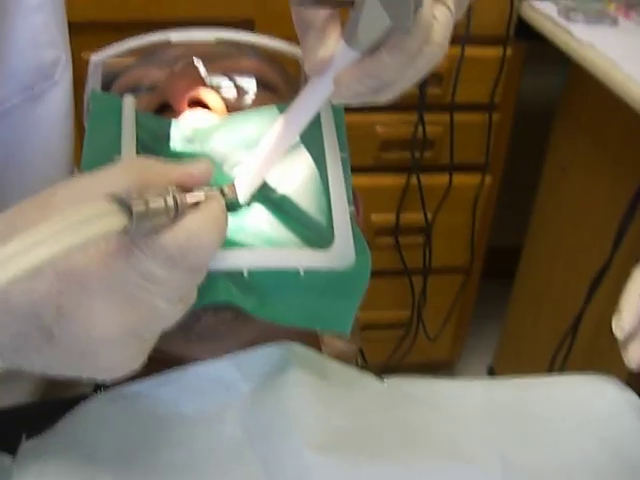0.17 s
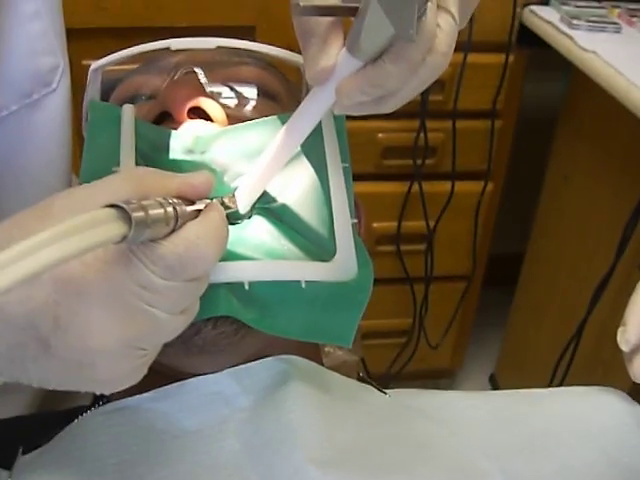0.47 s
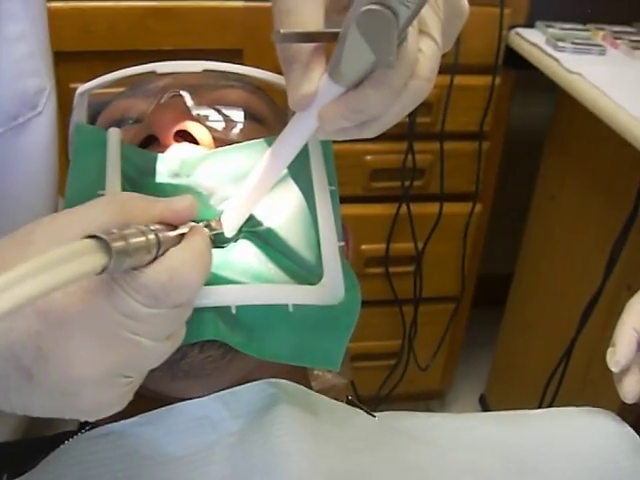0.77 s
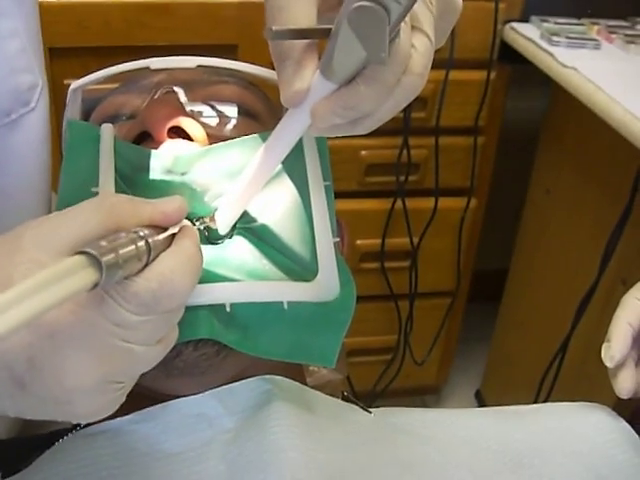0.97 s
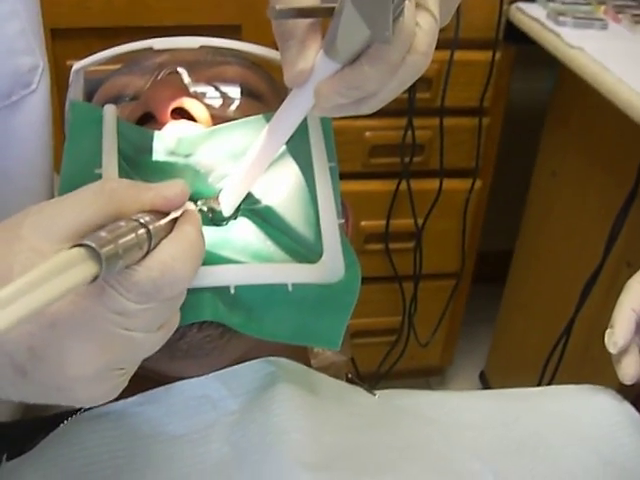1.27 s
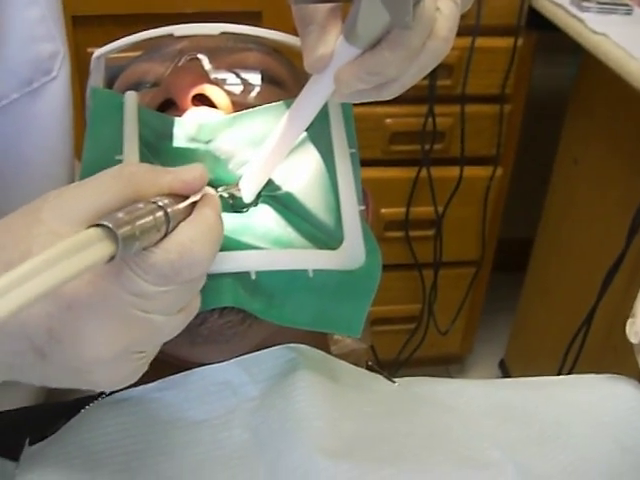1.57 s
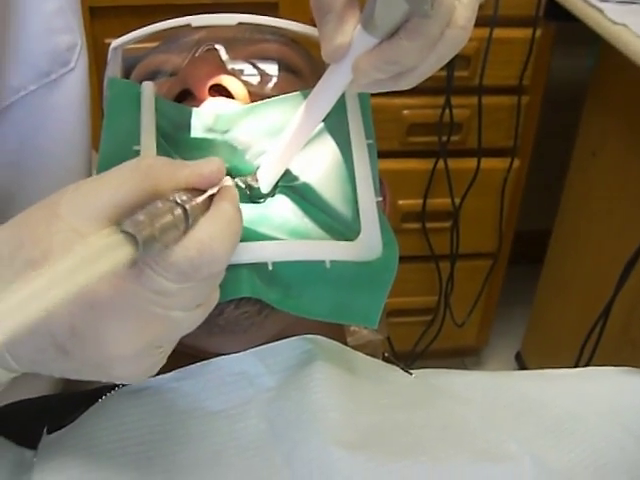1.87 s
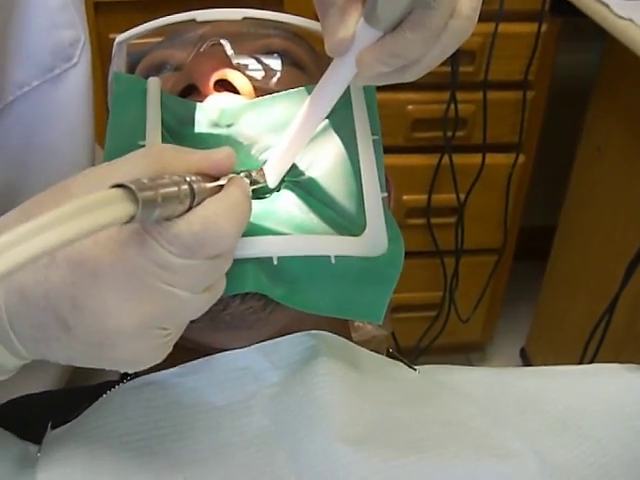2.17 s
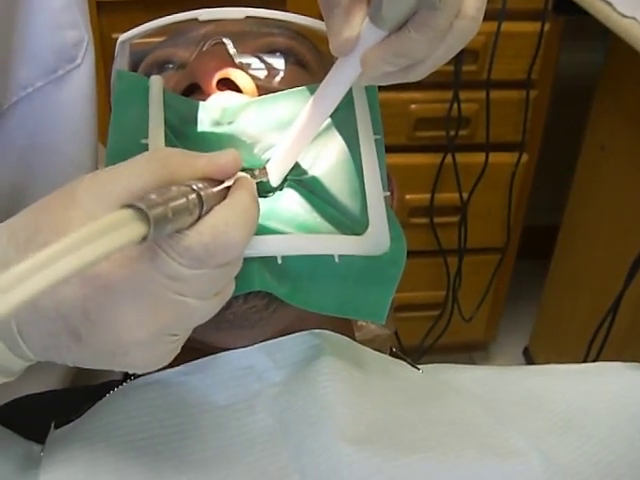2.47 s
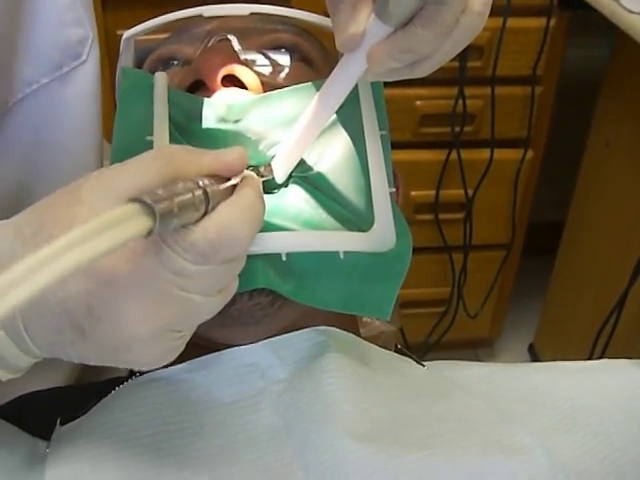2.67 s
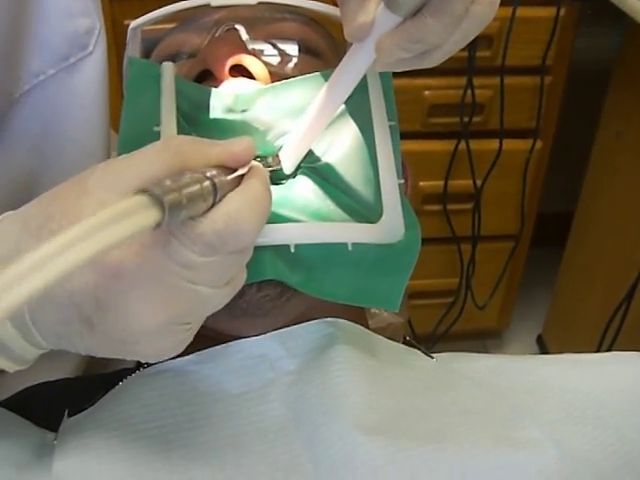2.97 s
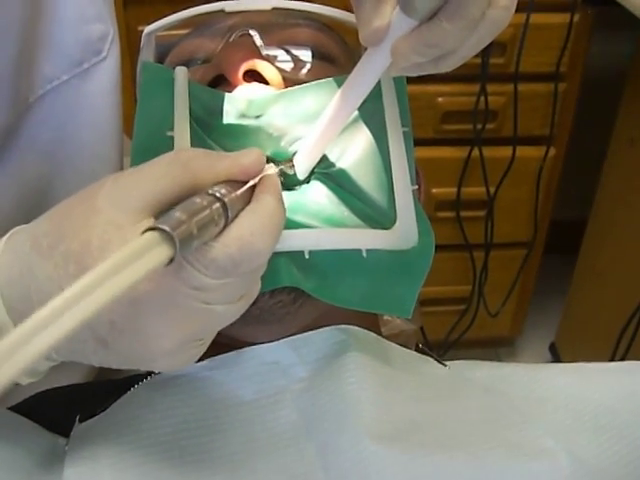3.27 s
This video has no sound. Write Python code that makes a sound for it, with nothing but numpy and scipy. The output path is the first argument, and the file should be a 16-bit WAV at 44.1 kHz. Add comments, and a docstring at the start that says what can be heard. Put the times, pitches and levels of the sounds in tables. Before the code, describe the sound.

High dental handpiece whine wavers and dips under load amid constant airy suction hiss.

```python
"""A dental air turbine whines close to the microphone, a swept sine with its octave; it slows and chatters in
spells as the bur bites into the tooth, and once the suction slurps with a rough band gliding upward. Shaped
noise gives the suction hiss, the spray and grinding fizz above it and the low clinic rumble. Narrow modulated
noise gives the whistles of the suction tube; a decaying noise tail gives the room. The microphone wakes with a
thump and its gain rises; soft bumps, a small click and brief blips follow."""
import sys
import numpy as np
from scipy import signal
from scipy.fft import rfft, irfft, next_fast_len
from scipy.io import wavfile
from scipy.ndimage import uniform_filter1d, map_coordinates

SR = 44100
rng = np.random.default_rng(int(sys.argv[2]) if len(sys.argv) > 2 else 0)


def store_pcm(level_fs):
    """Save levels as 16-bit WAV."""
    pcm = np.round(np.clip(level_fs, -1, 1) * 32767).astype(np.int16)
    wavfile.write(sys.argv[1], SR, np.atleast_2d(pcm).T)


def attenuation_scalar(level_db):
    """Turn a level in dB into a linear amplitude multiplier (20 dB per decade)."""
    decades = np.asarray(level_db, float) / 20
    return 10 ** decades


N = 150381
T = np.arange(N) / SR  # time [s]


def unit(x):
    """Normalization: scale to rms 1."""
    return x / np.sqrt(np.mean(x ** 2) + 1e-20)


def curves(rows):
    """Linear interpolation: one value per sample for each column after the time."""
    times, *columns = np.transpose(rows)
    return [np.interp(T, times, column) for column in columns]


def wobble(rate):
    """Band-limited noise: a smooth random curve through rate knots a second."""
    knots = rng.standard_normal(int(N * 2500 / SR) + 8)
    return map_coordinates(knots, [np.arange(N) * np.clip(rate, 0, 2500) / SR])


def phase(hz):
    """Phase [rad] is the running integral of frequency."""
    return 2 * np.pi * np.cumsum(hz) / SR


def noise_band(rate, turn):
    """Quadrature modulation: two random envelopes spread a carrier of phase turn into a band."""
    return wobble(rate) * np.sin(turn) + wobble(rate) * np.cos(turn)


def filtered(x, response):
    """Linear filtering: multiply the spectrum by a response of frequency."""
    size = next_fast_len(N + 8192)
    return irfft(rfft(x, size) * response(np.fft.rfftfreq(size, 1 / SR)), size)[..., :N]


def rush(spectrum, patchy_db):
    """Turbulence noise: coloured noise of rms 1 whose gain varies in time-frequency patches."""
    f, db = np.transpose(spectrum)
    z = signal.stft(rng.standard_normal(N), nperseg=512)[2]
    field = uniform_filter1d(rng.standard_normal(z.shape), size=5, axis=0)
    field = uniform_filter1d(field, size=10, axis=1)
    x = signal.istft(z * attenuation_scalar(patchy_db * unit(field)), nperseg=512)[1][:N]
    return unit(filtered(x, lambda hz: attenuation_scalar(np.interp(np.log(hz + 1), np.log(f), db))))


# Turbine speed as the pitch of the whine: (time [s], frequency [Hz])
SPEED = [(0.055, 6440), (0.12, 6320), (0.19, 6340), (0.284, 6210), (0.384, 6590), (0.419, 6650),
         (0.499, 6610), (0.534, 6400), (0.599, 5770), (0.629, 5620), (0.654, 5700), (0.714, 6240),
         (0.748, 6320), (0.823, 6140), (0.928, 5580), (0.988, 5630), (1.073, 5560), (1.152, 5550),
         (1.207, 5730), (1.307, 5800), (1.357, 5640), (1.372, 5640), (1.412, 5980), (1.467, 6330),
         (1.502, 6480), (1.537, 6540), (1.611, 6440), (1.721, 6550), (1.816, 6540), (1.886, 6120),
         (1.906, 6100), (1.936, 5920), (2.005, 6290), (2.08, 6470), (2.2, 6520), (2.305, 6480),
         (2.365, 6420), (2.439, 6190), (2.514, 5820), (2.539, 5780), (2.564, 5850), (2.669, 6340),
         (2.744, 6440), (2.794, 6430), (2.844, 6340), (3.048, 6480), (3.083, 6380), (3.118, 6180),
         (3.188, 6290), (3.218, 6230), (3.268, 6040), (3.342, 6000), (3.412, 6290)]
JITTER_HZ = 3.7


def rotor_phase():
    """Rotational source: the whine's phase follows the rotor speed, with a small random jitter."""
    return phase(uniform_filter1d(curves(SPEED)[0], size=700) + JITTER_HZ * wobble(120))


# Fundamental of the whine: (time [s], rms level [dB])
WHINE = [(0.055, -28), (0.165, -23.5), (0.26, -33), (0.285, -36), (0.319, -23.5), (0.364, -19),
         (0.384, -30), (0.399, -19.5), (0.424, -30), (0.439, -21), (0.479, -35), (0.504, -28), (0.539, -29),
         (0.65, -40), (0.662, -34), (0.7, -24), (0.725, -23), (0.745, -31), (0.795, -22), (0.815, -31),
         (0.868, -34), (0.888, -36), (0.938, -47), (0.955, -27), (0.985, -27), (1.013, -35), (1.048, -29),
         (1.083, -31), (1.102, -43), (1.142, -29), (1.152, -38), (1.192, -25), (1.23, -31), (1.27, -29.5),
         (1.372, -27), (1.402, -19.5), (1.517, -20.5), (1.546, -25), (1.686, -19.5), (1.756, -30.5),
         (1.821, -22), (1.846, -32), (1.896, -17.5), (1.926, -26.5), (1.976, -19.5), (2.16, -23),
         (2.29, -18.5), (2.35, -28.5), (2.469, -29), (2.519, -37), (2.555, -31), (2.579, -34),
         (2.619, -19.5), (2.664, -17.5), (2.789, -21.5), (2.824, -31), (2.868, -19.5), (2.908, -28),
         (2.928, -19), (2.998, -24), (3.033, -16), (3.088, -34), (3.124, -46), (3.131, -24), (3.178, -20.5),
         (3.213, -23), (3.263, -21), (3.312, -26), (3.332, -17), (3.367, -28), (3.392, -15), (3.412, -18)]
# Octave of the whine: (time [s], rms level [dB])
OCTAVE = [(.1, -50), (.4, -47), (.57, -36), (.7, -38), (.9, -45), (1.25, -46), (1.45, -41), (1.64, -39),
          (1.75, -44), (1.85, -39), (2.26, -42), (2.55, -37), (2.65, -42), (2.83, -38), (2.97, -39),
          (3.1, -36), (3.17, -44), (3.3, -37)]
FLUTTER_DB, OCTAVE_FLUTTER_DB = 1.5, 3.5


def whine(turn):
    """Harmonic radiation: a sine at the whine's pitch and its octave, each with fluttering level."""
    (level_db,), (octave_db,) = curves(WHINE), curves(OCTAVE)
    fundamental = attenuation_scalar(level_db + FLUTTER_DB * wobble(60)) * np.sin(turn)
    octave = attenuation_scalar(octave_db + OCTAVE_FLUTTER_DB * wobble(30.3)) * np.sin(2 * turn)
    return np.sqrt(2) * (fundamental + octave)  # sine peak from rms


# Cutting load as a rough smear around the whine: (time [s], level [dB])
LOAD = [(.1, -46), (.48, -48), (.58, -33), (.66, -48), (.86, -37), (1.35, -32), (1.45, -44), (2.4, -43),
        (2.51, -29), (2.6, -51), (3.07, -52), (3.095, -36), (3.13, -42), (3.3, -23.5), (3.41, -46)]
SMEAR_HZ, OCTAVE_SMEAR_DB = 710, -3  # width around the fundamental, relative level around the octave


def cutting_smear(turn):
    """Random modulation: cutting broadens the whine and its octave into bands of noise."""
    smear = noise_band(SMEAR_HZ, turn)
    octave_smear = noise_band(2 * SMEAR_HZ, 2 * turn)
    return attenuation_scalar(curves(LOAD)[0]) * (smear + attenuation_scalar(OCTAVE_SMEAR_DB) * octave_smear)


# Chatter of the bur: (time [s], length [s], offset from the whine [Hz], rms level at mid-length [dB])
CHATTER = [(.52, .13, 235, -32), (.82, .07, 235, -30), (1.29, .09, 270, -34), (3.27, .08, -270, -37)]
CHATTER_WANDER_HZ = 16.7


def chatter(turn):
    """Sideband principle: chatter puts a second, wandering line beside the whine."""
    wander = phase(CHATTER_WANDER_HZ * wobble(60))
    x = np.zeros(N)
    for s, length, offset_hz, db in CHATTER:
        swell = np.sin(np.pi * np.clip((T - s) / length, 0, 1)) ** .5
        line = np.sin(turn + wander + 2 * np.pi * offset_hz * T)
        x += attenuation_scalar(db + 2.1 * wobble(54.8)) * swell * line
    return np.sqrt(2) * x


def turbine():
    """Superposition: whine, smear and chatter share one rotor phase."""
    turn = rotor_phase()
    return whine(turn) + cutting_smear(turn) + chatter(turn)


# Suction hiss through its resonances: (frequency [Hz], relative density [dB per Hz])
SUCTION = [(700, -18.5), (900, -16.5), (1020, -8), (1200, -17.5), (1600, -10.5), (2050, -13), (2350, -2.5),
           (2500, -0.5), (2850, 0.5), (3150, -5), (3400, -1), (3750, 1), (4000, -3), (4500, -3.5),
           (4930, 0.5), (5200, -1.5), (6300, 0), (8000, -4), (10000, -13), (16000, -42)]


def suction(level_db):
    """Turbulent flow noise coloured by the resonances of the suction."""
    return attenuation_scalar(level_db + 0.68 * wobble(70)) * rush(SUCTION, patchy_db=0.89)


# Cooling spray and grinding fizz: (frequency [Hz], relative density [dB per Hz])
SPRAY = [(4000, -23), (6500, -20), (8800, 1.5), (9400, -0.5), (10800, 1), (12000, -4.5), (13400, -6.5),
         (14800, -14), (16000, -9)]


def spray(level_db, tilt_db):
    """Broadband jet and abrasion noise, with the part above about 11.8 kHz raised or lowered by the tilt."""
    fizz = rush(SPRAY, patchy_db=1.0)
    top = filtered(fizz, lambda hz: 1 / (1 + (11800 / (hz + 1)) ** 16))
    return attenuation_scalar(level_db + 0.62 * wobble(150)) * (fizz - top + attenuation_scalar(tilt_db) * top)


# Moving air: (time [s], suction level before +3 [dB], spray level before +1 [dB], treble tilt [dB])
AIR = [(0.2, -20.5, -21.5, 3), (0.22, -25, -23, 2), (0.35, -25.5, -25.5, 4), (1.04, -26.5, -21.5, 0.5),
       (1.4, -26, -24, -1), (1.48, -27.5, -25.5, 1), (1.64, -26, -25.5, 0.5), (1.91, -27, -24, -1),
       (2.09, -26.5, -25.5, 0), (2.25, -27.5, -27, 1), (2.42, -24.5, -24.5, 2), (2.56, -25.5, -21.5, -1),
       (2.64, -27, -26, 0.5), (3.13, -26, -26, 0.5), (3.18, -23.5, -22.5, -2), (3.21, -28.5, -21.5, -5),
       (3.41, -27, -25.5, 1)]


def air():
    """Common modulation: suction and spray flutter partly together."""
    suction_db, spray_db, tilt_db = curves(AIR)
    shared_db = 0.68 * wobble(24.84)
    return suction(suction_db + 3.0 + shared_db) + spray(spray_db + 1.0 + shared_db, tilt_db)


# Whistling modes of the suction tube: (frequency [Hz], mean level [dB])
TUBE = [(3700, -42.5), (4900, -40)]
# half-width and drift as shares of the mode frequency
TUBE_WIDTH_SHARE, TUBE_DRIFT_SHARE, TUBE_SWING_DB = .03, .015, 4


def tube():
    """Pipe modes driven by wet airflow: narrow noise bands that drift in pitch, each swelling on its own."""
    x = np.zeros(N)
    for hz, db in TUBE:
        turn = phase(hz * (1 + TUBE_DRIFT_SHARE * wobble(6)))
        rough = noise_band(2 * TUBE_WIDTH_SHARE * hz, turn)
        x += attenuation_scalar(db + TUBE_SWING_DB * wobble(9.06)) * rough
    return x


# Rumble of machines and ventilation: (frequency [Hz], relative density [dB per Hz])
CLINIC = [(20, -9), (40, -13), (65, 1), (95, -12.5), (135, 2.5), (250, -5), (500, -6.5), (900, -5),
          (2000, -12), (5000, -30)]
CLINIC_DB = -45


def clinic():
    """Ambient noise: a low rumble of machines and ventilation, gently varying in level."""
    return attenuation_scalar(CLINIC_DB + 1.6 * wobble(5.26)) * rush(CLINIC, patchy_db=0.3)


ROOM_T60_S = 0.27


def room(x):
    """Diffuse reverberation: convolution with an exponentially decaying noise tail of unit energy."""
    t = np.arange(SR // 2) / SR
    tail = rng.standard_normal(len(t)) * attenuation_scalar(-60 * t / ROOM_T60_S) * (t > .004)
    return signal.fftconvolve(x, tail / np.linalg.norm(tail))[:N]


HISS_ROOM_DB = -6.5  # before the roll-offs at both ends


def hiss_in_room(hiss):
    """Interference: reflections stamp fine steady bands on the hiss, at equal mean power."""
    def share(hz):
        return attenuation_scalar(HISS_ROOM_DB) / np.sqrt((1 + (hz / 6000) ** 2) * (1 + (1200 / (hz + 1)) ** 2))

    together = hiss + filtered(room(hiss), share)
    return filtered(together, lambda hz: 1 / np.sqrt(1 + share(hz) ** 2))


WAKE_S = .056  # the microphone comes on
THUMP_DB, THUMP_S = -32, 0.027  # scale and decay time constant


def thump():
    """Transient response: a fast rise and a slower exponential decay as the microphone wakes."""
    u = np.clip(T - WAKE_S, 0, None)
    return -attenuation_scalar(THUMP_DB) * (1 - np.exp(-u / 0.0015)) * np.exp(-u / THUMP_S)


# Soft bumps close to the microphone: (time [s], envelope peak [dB], frequency [Hz])
BUMPS = [(.223, -30, 130), (.2885, -35, 70)]
BUMP_CYCLES = 0.38  # half-width of the envelope, to 1/e


def bumps():
    """Impulsive excitation: an odd pulse, a sine under a Gaussian envelope."""
    x = np.zeros(N)
    for s, db, hz in BUMPS:
        envelope = np.exp(-((T - s) * hz / BUMP_CYCLES) ** 2)
        x += attenuation_scalar(db) * np.sin(2 * np.pi * hz * (T - s)) * envelope
    return x


# Small click close to the microphone: (time [s], peak [dB], frequency [Hz])
CLICKS = [(.2235, -16.5, 830)]
CLICK_CYCLES = 0.57  # half-width of the envelope, to 1/e


def clicks():
    """Impulsive excitation: an even pulse, a cosine under a Gaussian envelope."""
    x = np.zeros(N)
    for s, db, hz in CLICKS:
        envelope = np.exp(-((T - s) * hz / CLICK_CYCLES) ** 2)
        x += attenuation_scalar(db) * np.cos(2 * np.pi * hz * (T - s)) * envelope
    return x


# Brief soft blips: (time [s], envelope half-width to 1/e [s], frequency [Hz], envelope peak [dB])
BLIPS = [(1.392, 0.0047, 2900, -21), (1.605, 0.051, 490, -42)]


def blips():
    """Tone burst: a sine under a Gaussian envelope."""
    x = np.zeros(N)
    for s, length, hz, db in BLIPS:
        x += attenuation_scalar(db) * np.sin(2 * np.pi * hz * T) * np.exp(-((T - s) / length) ** 2)
    return x


# Gurgling slurp of the suction: (time [s], length [s], start frequency [Hz], end frequency [Hz], level at mid-
# length [dB])
SLURPS = [(2.34, .14, 2750, 4920, -32.5)]


def slurp():
    """Gurgling flow noise: a rough band glides upward as the suction slurps."""
    x = np.zeros(N)
    for s, length, from_hz, to_hz, db in SLURPS:
        u = np.clip((T - s) / length, 0, 1)
        turn = phase(from_hz + (to_hz - from_hz) * u)
        x += attenuation_scalar(db) * np.sin(np.pi * u) * noise_band(600, turn)
    return x


ROOM_DB = -19  # reverberation of the turbine and slurp


def scene():
    """Superposition at one point: a single microphone signal, the same in both channels."""
    tool = turbine() + slurp()
    hiss = hiss_in_room(air() + tube())
    pulses = bumps() + clicks() + blips()
    x = tool + attenuation_scalar(ROOM_DB) * room(tool) + hiss + clinic() + pulses
    return np.array([x, x])


def low_pass(x):
    """Removes everything above the highest recorded frequency."""
    return signal.sosfilt(signal.butter(12, 15720, fs=SR, output="sos"), x)


NOTCH_HZ, NOTCH_WIDTH_HZ, NOTCH_DEPTH = 7904, 635, 0.81  # dip in the microphone's response
TOP_HZ = 15720  # nothing of the scene is kept from here up
WAKE_DB, RISE_S = -13.5, 0.17  # gain at waking, time to recover to 0 dB


def record(dry):
    """Transducer response: a notched microphone wakes with a thump and rising gain; the top is cut off."""
    def notch(hz):
        return 1 - NOTCH_DEPTH / (1 + (2 * (hz - NOTCH_HZ) / NOTCH_WIDTH_HZ) ** 2)

    u = np.clip(T - WAKE_S, 0, None)
    gain = (u > 0) * attenuation_scalar(WAKE_DB * np.clip(1 - u / RISE_S, 0, 1))  # silent before waking
    heard = filtered(dry, lambda hz: notch(hz) * (hz < TOP_HZ))
    mix = heard * gain + thump()
    return low_pass(mix)


dry = scene()
out = record(dry)
store_pcm(out)
```